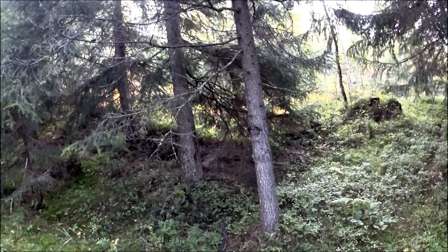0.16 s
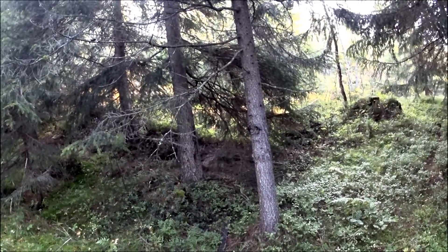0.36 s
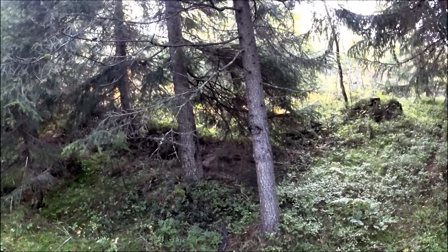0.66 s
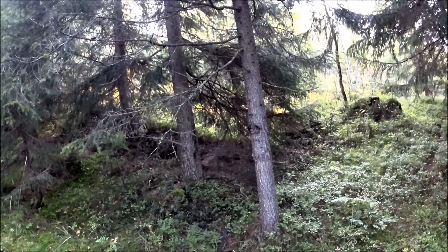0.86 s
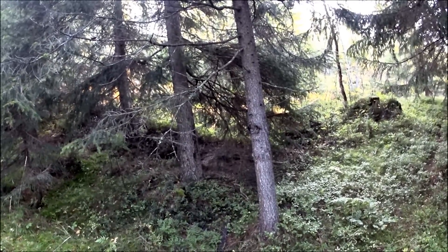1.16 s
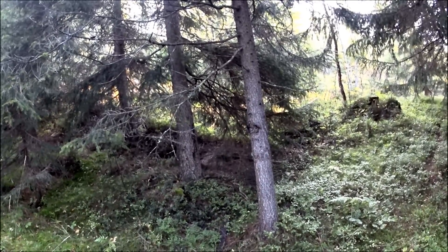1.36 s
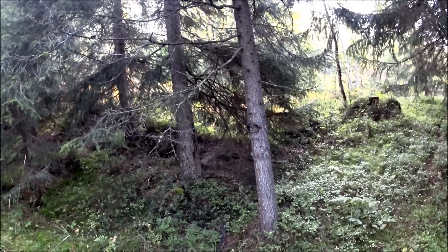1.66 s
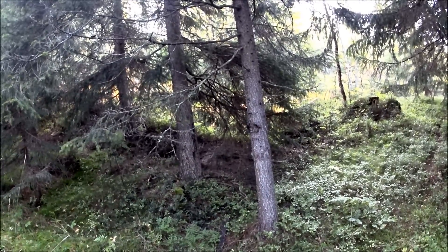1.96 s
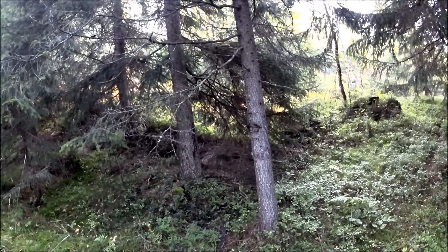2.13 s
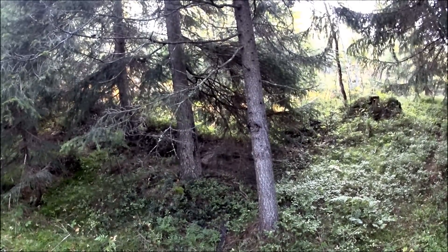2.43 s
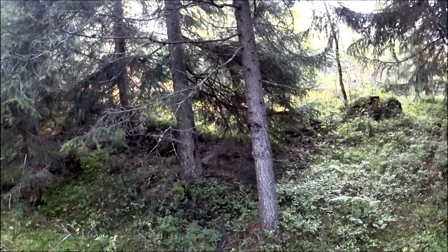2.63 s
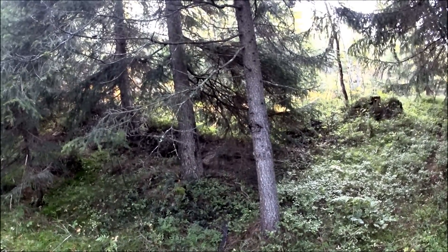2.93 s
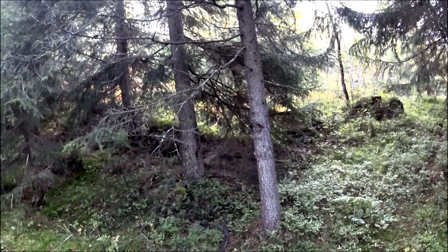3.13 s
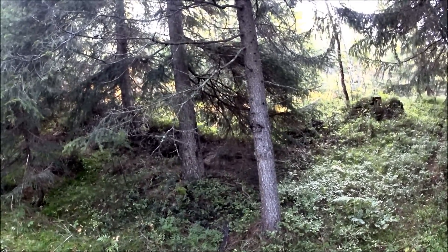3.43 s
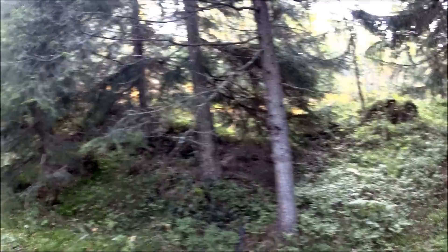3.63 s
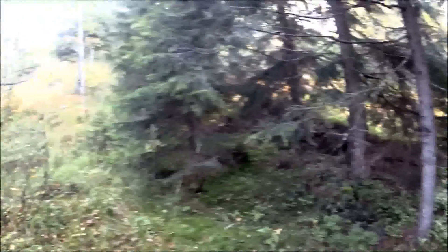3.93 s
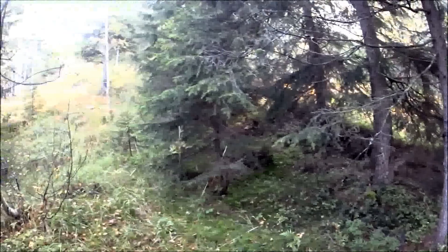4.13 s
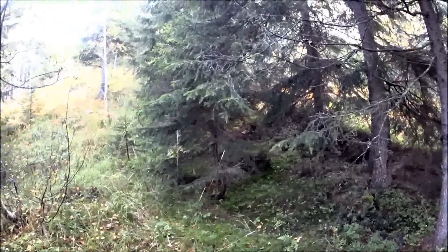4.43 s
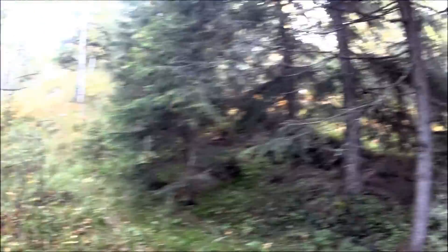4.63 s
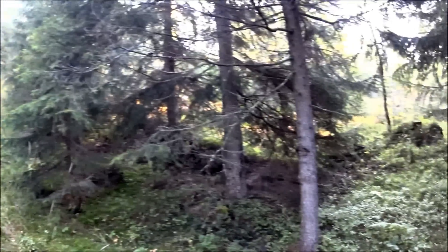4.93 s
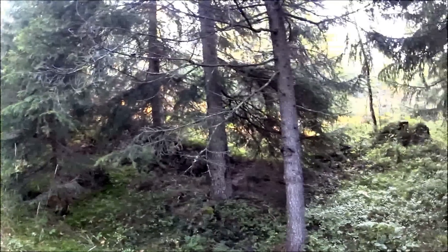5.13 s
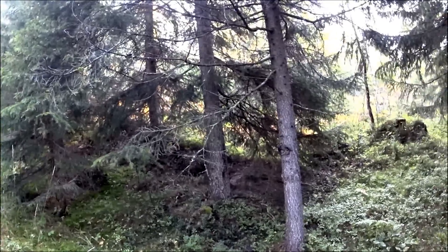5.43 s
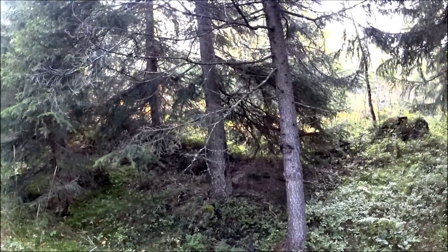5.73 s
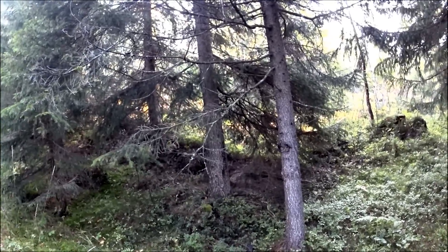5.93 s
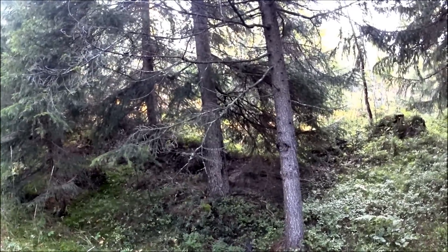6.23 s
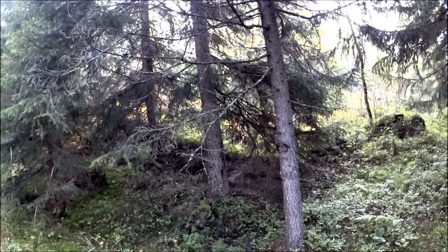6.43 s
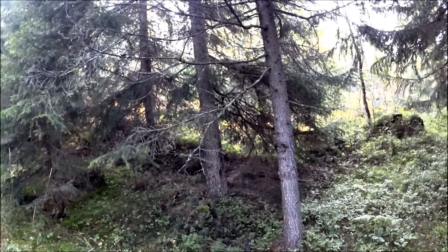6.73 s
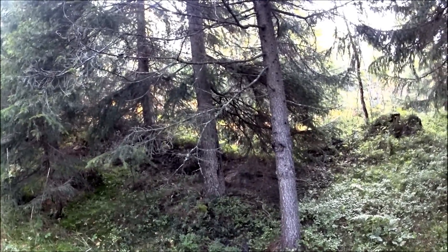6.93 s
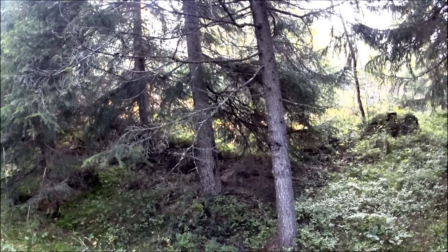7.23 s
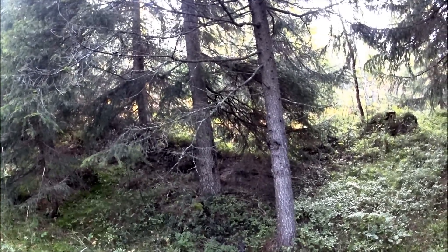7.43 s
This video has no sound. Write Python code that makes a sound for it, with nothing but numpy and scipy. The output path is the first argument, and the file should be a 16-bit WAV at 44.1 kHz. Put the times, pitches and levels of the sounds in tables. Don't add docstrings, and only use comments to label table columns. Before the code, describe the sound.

Hunting dog yelps every half second among spruces, some cracking into rough barks, with ringing echo, handling clicks and faint bird notes.

```python
import sys
import numpy as np
from scipy import signal
from scipy.fft import rfft, irfft
from scipy.io import wavfile
from scipy.ndimage import uniform_filter1d, map_coordinates

SR = 44100
rng = np.random.default_rng(int(sys.argv[2]) if len(sys.argv) > 2 else 0)


def gain_from_decibels(decibels):
    exponent = np.asarray(decibels, float) / 20
    return 10 ** exponent


def store_wav(level_fs):
    pcm = np.round(np.clip(np.atleast_2d(level_fs), -1, 1) * 32767)
    wavfile.write(sys.argv[1], SR, pcm.T.astype(np.int16))


N = 333837

# (frequency [Hz], level per Hz [dB])
HISS = [(15, -48), (25, -11.5), (47, -11), (81, -10), (145, -9), (270, -8.5), (600, -8), (1200, -9.5),
        (1600, -12), (2800, -15.5), (6000, -18), (15700, -21)]
# (frequency [Hz], likeness [-1 to 1])
LIKENESS = [(60, 0.85), (130, 0.5), (290, -0.1), (640, -0.32), (1410, -0.52), (3100, -0.35), (6820, 0.39),
            (15000, 0.88)]
# (frequency [Hz], width [Hz], level [dB])
HUM = [(59.6, 5.5, -75.5), (120.3, 5.4, -82.5)]
HISS_DB, QUIET_FROM_S, SINK_DB_PER_S = -57.5, 6.48, 3.5

# (time [s], length [s], level [dB])
RUSTLE = [
    (5.203, 0.11, -49.5),
    (5.529, 0.13, -51.5),
    (6.518, 0.095, -56.5),
]
# (frequency [Hz], level per Hz [dB])
CLOTH = [(150, -16), (400, 1), (900, 3), (1900, 4), (3200, -5), (5000, -12.5), (7500, -12.5), (9500, -53)]
# (time [s], peak [dB], ring
# [Hz], time to fall 60 dB [s])
KNOCKS = [(2.197, -37.5, 790, 0.033), (5.2265, -28, 1300, 0.007), (6.105, -41, 2900, 0.005),
          (6.105, -33, 1650, .008), (5.2735, -38, 6200, .003), (5.2735, -32, 2600, .003),
          (5.273, -37.5, 3340, 0.015), (5.273, -52, 2300, .015), (5.273, -40, 610, 0.016),
          (5.273, -46, 4370, .012), (5.543, -31, 702, 0.046), (5.56, -47, 316, 0.092),
          (5.274, -48, 5515, 0.011), (5.556, -43, 1720, 0.06), (5.558, -36, 2600, .004),
          (5.585, -44, 1800, .07), (5.625, -50, 1760, 0.077), (6.42, -43, 5040, 0.0055),
          (6.541, -49, 1980, 0.12)]
# (time [s], peak [dB], ring [Hz])
TICKS = [
    (5.2115, -46, 2180),
    (5.2167, -44, 1818),
    (5.2258, -38, 2217),
    (5.2413, -41, 1930),
]
TICK_T60_S = 0.011
# (time [s], peak [dB], ring [Hz], time to fall 60 dB [s])
BUCKLE = (5.2726, -23, 1200, .016)
# (time [s], level [dB])
SQUEEZES = [
    (.25, -74),
    (3.57, -62.5),
    (3.86, -68),
    (4.04, -65),
    (4.62, -69),
    (4.76, -66),
    (5.26, -63),
    (6.09, -67),
]
GRIP_DB, GRIP_WAVER_DB, SQUEEZE_S = -76, 1, 0.04

# (time [s], length [s], start pitch [Hz], end pitch [Hz], level [dB])
CHIRPS = [
    (5.694, 0.018, 5200, 4820, -68.5),
    (5.714, 0.031, 4580, 5680, -60),
    (5.948, 0.011, 4800, 4560, -58.5),
    (6.283, 0.021, 4264, 4615, -66),
    (6.3, 0.017, 4757, 5675, -62),
    (6.441, 0.016, 8000, 7360, -65),
    (6.442, 0.012, 4760, 4350, -60),
]

# (frequency [Hz], near trunks fall 60 dB in [s], far slopes fall 60 dB in [s], side share [0-1])
SCATTER = [(300, 0.077, 0.34, 0.4), (412, 0.36, 1.26, 0.1), (560, 0.12, 2.17, 0.2), (790, 0.15, 1.74, 0.3),
           (1200, 0.45, 2.84, 0.55), (1700, 0.36, 2.2, 0.6), (2400, 0.5, 1.72, 0.97), (4000, 1, 1.3, 0.9),
           (8000, 0.59, 0.42, 0.52)]
# (time [s], spread [ms])
SWAY = [(0, .05), (1.4, .04), (1.6, .06), (1.9, .06), (2.4, .1), (2.9, .04), (3.8, .04), (3.9, .11),
        (4.9, .09), (5.9, .015)]
NEEDLE_HZ, NEEDLE_PASS = 2960, 0.82
# (time [s], pitch [Hz], width
# [Hz], level [dB], time to fall 60 dB [s])
WOOD_RINGS = [(6.08, 735, 51, -42, 0.4), (0.29, 1245, 120, -47.5, 2.6), (.6, 535, 28, -51, 1.56),
              (6.06, 2390, 42, -50, 1.3), (6.06, 616, 83, -49, 0.48), (5.985, 1770, 350, -51.5, 0.83),
              (0.9, 543, 33, -58, 3.6), (6.08, 1208, 33, -40, 2.13), (1.97, 550, 32, -54, 0.51),
              (5.1, 1101, 149, -50, 3.7), (5.1, 2240, 220, -63, 3.4), (3.95, 1030, 90, -37, 1.3),
              (3.96, 2090, 140, -49, 2.0), (4.015, 820, 220, -45, .9), (6.45, 1205, 25, -55, 3.5),
              (.75, 540, 14, -56, 3.5),
              (6.05, 3000, 900, -53, .5), (6.04, 5200, 3000, -57, .4), (3.9, 3130, 150, -63, .9),
         (3.9, 4180, 200, -65, .9), (3.28, 585, 40, -53, 2.5), (3.6, 570, 60, -54, 2.5),
         (4.6, 420, 50, -60, 2.5), (2.0, 1110, 90, -47, 1.3), (3.46, 1450, 250, -46, .7),
         (4.9, 1100, 110, -43, 1.5)]
# (time [s], length [s], start pitch [Hz], end pitch
# [Hz], level [dB])
BRIEF_TONES = [(.527, .008, 1180, 1170, -40), (.549, .016, 1173, 1140, -37), (0.606, 0.037, 548, 535, -45),
               (.655, 0.053, 540, 527, -49), (3.075, .035, 895, 900, -36), (3.2, .06, 1190, 1185, -43),
               (3.655, .03, 1200, 1205, -43), (1.962, .024, 1110, 1130, -40), (1.93, .01, 1150, 1120, -44),
               (1.522, 0.05, 1295, 1250, -42), (2.0, .013, 1270, 1260, -34), (6.14, .05, 2380, 2370, -48),
               (6.24, .07, 2370, 2360, -52), (6.34, .07, 2370, 2370, -55), (3.996, 0.015, 1055, 1045, -29.5),
               (4.016, 0.024, 1040, 1035, -36), (3.958, .014, 1036, 1060, -31), (4.02, .03, 2080, 2050, -44),
               (4.075, .016, 1015, 1015, -38), (1.578, .024, 2200, 2150, -52), (1.622, .03, 2200, 2180, -56),
               (1.692, 0.023, 1140, 1130, -43.5), (2.446, .02, 1150, 1140, -41.5),
               (2.592, 0.017, 1900, 1900, -63), (6.49, .02, 1200, 1200, -45.5), (1.61, 0.012, 1120, 1100, -42),
               (1.628, .012, 1127, 1110, -44), (2.218, 0.017, 1155, 1140, -44), (4.87, 0.028, 1118, 1070, -31),
               (4.94, 0.028, 2260, 2250, -44), (6.07, 0.022, 2400, 2400, -38), (6.115, 0.018, 2394, 2400, -43),
               (6.075, 0.029, 1200, 1233, -30), (6.25, 0.031, 1192, 1220, -37), (6.462, 0.031, 1200, 1161, -40),
               (6.62, 0.022, 1220, 1180, -58)]

# (time [s], held length [s], pitch [Hz], end pitch [Hz], level [dB])
YELPS = [
    (.045, 0.13, 1200, 1087, -46),
    (.524, 0.038, 1178, 1126, -45),
    (1.018, 0.096, 1173, 1118, -43),
    (1.93, .11, 1105, 1085, -44),
    (2.42, 0.032, 1165, 1098, -39.5),
    (2.924, 0.036, 1180, 1163, -30),
    (3.408, 0.0309, 1180, 1260, -36.5),
]
# (swell [s], slack [dB], last push re first [dB], octave partial at first [dB], octave later [dB])
EFFORT = [
    (0.01, 4, 8, -22, -54),
    (0.0094, 4, -1, -11, -25),
    (0.0067, 21, -7, -15, -18.5),
    (0.0499, 20, -3.5, -22, -23),
    (0.015, 9.5, -2.5, -32, -32),
    (0.0054, 0, -8.5, -34, -18),
    (0.01, -4, 1.5, -4.5, -24),
]
ATTACK_S, ATTACK_DB, SWELL_DB_PER_S = 0.0049, 28, 173
SLACK_AT, SAG_BY_SLACK = 0.54, 0.358
RELEASE_S, RELEASE_DB = 0.009, 9.5
SLIDES = {4: (0.029, 918, 1)}
SLIDE_EARLY, SLIDE_OCTAVE_DB = 0.39, -11

# (time [s], pitch [Hz], level [dB], octave partial re fundamental [dB])
BROKEN_BAY = [(1.458, 1170, -60, -1), (1.463, 1160, -41.5, -3), (1.476, 1150, -50, 6),
              (1.5, 1167, -41.5, -30), (1.53, 1146, -58, -5), (1.555, 1130, -56, -10),
              (1.576, 1104, -39, -17), (1.595, 1074, -43.5, -9), (1.62, 730, -57, -38)]
LOW_BAY = [(3.885, 1058, -52, -18), (3.891, 1063, -34, -19), (3.92, 1040, -32.5, -11),
           (3.943, 1037, -31, -11.5), (3.958, 1035, -46, -13), (3.98, 1061, -31.5, -26),
           (3.991, 1031, -47, -13), (4.004, 880, -34.5, -20), (4.018, 596, -42.5, -45)]
CRACKED_BAY = [(4.248, 1118, -51, -13), (4.26, 1115, -34.5, -14), (4.282, 1115, -29, -19),
               (4.294, 1123, -33, -17), (4.305, 1114, -45.5, -5), (4.335, 1100, -43, -5),
               (4.351, 1074, -30.5, -17.5), (4.364, 900, -37.5, -16), (4.384, 570, -39, -45)]
THROBBING_BAY = [(4.713, 1148, -65, -15), (4.72, 1149, -28, -13.5), (4.734, 1139, -41.5, 2),
                 (4.748, 1134, -30, -18), (4.775, 1113, -36, -7), (4.8, 1109, -36.5, -10),
                 (4.816, 1087, -30.5, -14), (4.829, 949, -38.5, -11), (4.85, 600, -43.5, -40)]
LAST_BAY = [(5.983, 1046, -41, 4), (5.988, 1091, -30, -5.5), (5.999, 1164, -32, -9), (6.018, 1171, -23, 2),
            (6.029, 1200, -22.5, 0), (6.039, 1236, -29.5, -2.5), (6.047, 1200, -26.5, -7),
            (6.057, 1096, -28, -3.5), (6.064, 950, -41, 6)]

# (left minus right [dB], forest tail [dB], breath [dB], upper partials [dB])
PLACES = [(-4, 1, -40, -10), (-5, 6.5, -33, -9), (-4, 6.5, -34, -8), (-5, -1.5, -25, -2),
          (-4.5, -0.5, -27, 1), (-4, 1.5, -32, -8), (-4.5, -2, -26, -5), (-4.5, 0, -25, -5),
          (-8.5, -7, -33, -7.5), (-9, -2, -26.5, -3), (-7.5, -2.5, -20.5, -3), (-5, -10, -28.5, 0.5)]
UPPER = [-29, -32.5, -34.5, -51, -40]
# (frequency [Hz], level [dB])
MOUTH = [(450, -20), (700, 3), (880, -3), (1020, -0.86), (1300, -0.35), (1650, 28), (1950, 3.5),
         (2150, 3.5), (2600, -5.5)]
# (time [s], length [s], start pitch [Hz], end pitch [Hz], level [dB])
WHISTLES = [(.05, 0.027, 1230, 1365, -42), (1.522, 0.049, 1295, 1250, -45),
            (.047, 0.014, 2390, 2410, -50.5), (1.985, 0.018, 1240, 1270, -33), (3.455, .04, 930, 865, -37),
            (3.45, .075, 1740, 1735, -50), (3.53, .03, 2160, 2140, -54), (2.965, .04, 425, 470, -42),
            (4.762, 0.038, 1300, 1285, -36.5), (4.81, 0.047, 1320, 1200, -44.5), (.56, 0.03, 570, 550, -51),
            (2.926, 0.028, 3560, 3540, -62), (2.926, .02, 4750, 4740, -64), (2.926, 0.033, 5940, 5900, -61),
            (3.41, 0.018, 4750, 4800, -66), (1.96, 0.021, 1680, 1720, -56), (6.075, 0.056, 466, 377, -53),
            (5.3, 0.031, 500, 380, -58), (5.976, 0.018, 757, 830, -39.5), (6.058, 0.0202, 855, 680, -30.5),
            (.533, 0.026, 3560, 3520, -63.5), (1.025, .03, 3520, 3480, -65.5),
            (1.462, 0.02, 5760, 5740, -61), (1.56, 0.057, 4430, 4380, -66), (2.425, .055, 3480, 3330, -58),
            (2.505, 0.036, 3400, 3450, -66), (4.755, 0.017, 1155, 1176, -33),
            (2.428, 0.022, 5850, 5780, -64), (4.258, 0.038, 6750, 6550, -62.5),
            (4.32, 0.0343, 1800, 1580, -42), (4.72, 0.04, 5750, 5600, -56.5),
            (5.995, 0.034, 3470, 3540, -49.5), (6.015, 0.069, 4800, 4760, -57),
            (2.48, 0.078, 965, 940, -48.5), (2.49, .07, 1950, 1870, -65.5)]
BEAM_HZ = 3000

# (time [s], length [s], pitch [Hz], level [dB], top [Hz])
BARKS = [(.075, 0.1, 300, -43.5, 1700), (0.554, 0.067, 277.5, -48, 1200), (1.938, 0.063, 257.3, -60.5, 601),
         (2.962, 0.047, 217, -35, 1520), (2.992, 0.062, 285, -33, 1420), (3.443, 0.048, 215.9, -35.5, 2150),
         (3.478, 0.049, 289, -35, 2400), (4.305, 0.049, 205.2, -31, 955), (4.77, 0.056, 309.5, -44.5, 2194)]
# (frequency [Hz], width [Hz], level [dB])
THROAT = [(457, 208, -2.5), (624, 176, -1), (900, 144, 2), (1180, 200, -5), (1680, 360, -7.5),
          (2260, 91, -13)]
BARK_RISE, ROUGH_AT_200_HZ, ROUGH_PER_HZ = 1.09, .26, 0.0028
# (time [s], level [dB])
GASPS = [
    (4.83, -44),
    (6.058, -40.5),
]
# (length [s], start pitch [Hz], end pitch [Hz], roughness [0-1], top [Hz])
GASP = (0.038, 200, 240, 0.38, 3200)


def rms_one(x):
    return x / np.sqrt(np.mean(x ** 2) + 1e-20)


def at_hz(points, hz):
    table = np.array(points)
    return np.interp(np.log(hz), np.log(table[:, 0]), table[:, 1])


def add(track, s, sound):
    i = round(s * SR)
    track[..., i:i + sound.shape[-1]] += sound[..., :N - i]


def pan(x, db):
    return x * gain_from_decibels(np.array([[db / 2], [-db / 2]]))


def filtered(x, order, hz, kind="low"):
    return signal.sosfilt(signal.butter(order, hz, kind, fs=SR, output="sos"), x)


def resonance(x, hz, width):
    r = np.exp(-np.pi * width / SR)
    top = np.array([1, 0, -1]) * (1 - r * r) / 2
    return signal.lfilter(top, [1, -2 * r * np.cos(2 * np.pi * hz / SR), r * r], x)


def waver(size):
    smooth = uniform_filter1d(rng.standard_normal(N), size=size)
    return rms_one(uniform_filter1d(smooth, size=size))


def flicker(count, size):
    smooth = uniform_filter1d(rng.standard_normal(N // 4), size=size)
    return rms_one(uniform_filter1d(smooth, size=size))[:count]


def coloured(spectrum, likeness):
    hz = np.maximum(np.arange(N // 2 + 1) * SR / N, 1)
    mid, side = rfft(rng.standard_normal((2, N))) * gain_from_decibels(at_hz(spectrum, hz))
    alike = np.clip(at_hz(likeness, hz), -.95, .95)
    side = side * np.sqrt((1 - alike) / (1 + alike))
    mid, side = irfft(mid, N), irfft(side, N)
    return np.array([mid + side, mid - side]) / np.std(mid)


def glide(length, from_hz, to_hz, db):
    u = np.linspace(0, 1, round(length * SR))
    phase = 2 * np.pi * np.cumsum(from_hz + (to_hz - from_hz) * u) / SR
    return gain_from_decibels(db) * np.sqrt(2) * np.sin(np.pi * u ** 0.87) * np.sin(phase)


def recorder_floor():
    hum = np.zeros(N)
    for hz, width, db in HUM:
        noise = rng.standard_normal(N)
        hum += gain_from_decibels(db) * rms_one(resonance(resonance(noise, hz, width), hz, width))
    quiet_s = np.maximum(0, np.arange(N) / SR - QUIET_FROM_S)
    return gain_from_decibels(HISS_DB - SINK_DB_PER_S * quiet_s) * coloured(HISS, LIKENESS) + pan(hum, -2.1)


def rustle():
    t, level = np.arange(N) / SR, np.zeros(N)
    for s, length, db in RUSTLE:
        level += gain_from_decibels(db) * np.sin(np.pi * np.clip((t - s) / length, 0, 1)) ** .7
    grain = gain_from_decibels(2.6 * rms_one(uniform_filter1d(rng.standard_normal(N), size=90)))
    return level * grain * coloured(CLOTH, [(100, .7), (10000, .6)])


def knocks():
    t, out = np.arange(4000) / SR, np.zeros(N)
    for s, db, hz, t60 in [*KNOCKS, BUCKLE] + [(*tick, TICK_T60_S) for tick in TICKS]:
        onset = 1 - np.exp(-t * hz / 1.2)
        add(out, s, gain_from_decibels(db - 60 * t / t60) * onset * np.sin(2 * np.pi * hz * t))
    return pan(out, -5.5)


def grip():
    t = np.arange(N) / SR
    rumble = coloured([(30, -28), (80, 0.0), (160, -6.5), (300, -14.0), (600, -61)],
                      [(50, 1.0), (300, 0.68)])
    pressure = gain_from_decibels(GRIP_DB + GRIP_WAVER_DB * waver(size=3000))
    for s, db in SQUEEZES:
        pressure += gain_from_decibels(db) * np.exp(-((t - s) / SQUEEZE_S) ** 2)
    return pressure * rumble


def bird():
    out = np.zeros(N)
    for s, *note in CHIRPS:
        add(out, s, glide(*note))
    return pan(out, -1.4)


def far_ring(s, hz, width, db, t60):
    age = np.maximum(0, np.arange(N) / SR - s)
    noise = rng.standard_normal((2, N))
    mid, side = rms_one(resonance(resonance(noise, hz, width), hz, width))
    level = gain_from_decibels(db - 60 * age / t60) * np.minimum(1, age / 0.013)
    return level * pan(1.0, -6.5) * (mid + 0.38 * side * np.array([[1], [-1]]))


def forest():
    t, out = np.arange(round(2.5 * SR)) / SR, 0
    white = rng.standard_normal((2, 2, len(t)))
    edges = 200 * 2 ** np.arange(0, 6.1, 1 / 3)
    hz, *columns = np.transpose(SCATTER)
    for k, (low, high) in enumerate(zip(edges, edges[1:])):
        centre = np.log(low * high) / 2
        near, far, share = (np.interp(centre, np.log(hz), c) for c in columns)
        mid, side = filtered(white[k % 2], 2, [low, high], "band")
        decay = gain_from_decibels(-60 * t / near) + gain_from_decibels(-4.5 - 60 * t / far)
        out = out + decay * (mid + share * side * np.array([[1], [-1]]))
    return out * (1 - np.exp(-t / 0.011)) * gain_from_decibels(-33.5)


def scattered(sent, trunks):
    samples = np.arange(N)
    spread_ms = np.interp(samples / SR, *np.transpose(SWAY))
    late = samples + spread_ms * SR / 1000 * waver(size=300)
    smeared = map_coordinates(sent, [late])
    return pan(0.99, -3.0) * signal.fftconvolve(smeared[None], trunks, axes=1)[:, :N]


def outline(bay):
    s, length, hz, end_hz, db = YELPS[bay]
    swell, slack_db, last_db, octave_db, later_db = EFFORT[bay]
    swell = np.clip(swell, 1.1 * ATTACK_S, .7 * length)
    start_db, last_db = db - SWELL_DB_PER_S * (swell - ATTACK_S), db + last_db
    slack_s = swell + SLACK_AT * (length - swell)
    slack_hz = hz + SAG_BY_SLACK * (end_hz - hz)
    rows = [(0, hz, start_db - ATTACK_DB, octave_db),
            (ATTACK_S, hz, start_db, octave_db),
            (swell, hz, db, octave_db),
            (slack_s, slack_hz, db - slack_db, later_db),
            (length, end_hz, last_db, later_db)]
    slide, to_hz, loss_db = SLIDES.get(bay, (0, end_hz, 0))
    if slide:
        half_hz, half_db = end_hz + SLIDE_EARLY * (to_hz - end_hz), last_db - loss_db
        rows += [(length + slide / 2, half_hz, half_db, later_db + SLIDE_OCTAVE_DB),
                 (length + slide, to_hz, half_db - RELEASE_DB, later_db + 2 * SLIDE_OCTAVE_DB)]
    else:
        rows += [(length + RELEASE_S, end_hz, last_db - RELEASE_DB, later_db)]
    return np.array(rows) + [s, 0, 0, 0]


def yelp(rows, breath_db, upper_db):
    s, hz, db, octave_db = np.transpose(rows)
    t = np.arange(s[0], s[-1], 1 / SR)
    count = len(t)
    pitch = np.interp(t, s, hz) * (1 + .006 * flicker(count, size=250))
    phase = 2 * np.pi * np.cumsum(pitch) / SR
    voice = gain_from_decibels(at_hz(MOUTH, pitch)) * np.sin(phase)
    low_db = 200 * np.minimum(0, np.log2(pitch / 985))
    octave_level = gain_from_decibels(np.interp(t, s, octave_db) + at_hz(MOUTH, 2 * pitch) + low_db)
    voice -= octave_level * np.cos(2 * phase)
    slack_db = 90 * np.minimum(0, np.log2(pitch / hz[1]) + 0.059)
    for k, level in enumerate(UPPER, 3):
        partial_db = level + upper_db + slack_db + 4.5 * flicker(count, size=140)
        voice += gain_from_decibels(partial_db) * np.sin(k * phase + k)
    air = filtered(rng.standard_normal(N // 4)[:count], 4, [1300, 7500], "band")
    late = ((t - s[0]) / (s[-1] - s[0])) ** 3
    voice *= gain_from_decibels(4.94 * late * flicker(count, size=130))
    breath = gain_from_decibels(breath_db + 7.0) * late ** 0.38 * air
    edges = np.minimum(1, np.minimum(t - s[0], s[-1] - t) / .003)
    return edges * gain_from_decibels(np.interp(t, s, db)) * (np.sqrt(2) * voice + breath)


def bark(length, from_hz, to_hz, db, rough, top_hz):
    u = np.linspace(0, 1, round(length * SR))
    wobble, noise = rng.standard_normal((2, N // 32))[:, :len(u)]
    unsteady = 1 + .12 * rough * rms_one(uniform_filter1d(wobble, size=200))
    pitch = (from_hz + (to_hz - from_hz) * u) * unsteady
    pulses = np.diff(np.floor(np.cumsum(pitch) / SR), prepend=0)
    source = pulses * (1 + .8 * rough * wobble) + 0.22 * rough * noise
    voice = np.zeros(len(u))
    for k, (hz, width, gain_db) in enumerate(THROAT):
        voice += (-1) ** k * gain_from_decibels(gain_db) * resonance(source, hz, width)
    voice = filtered(voice, 6, [1.93 * from_hz, 2450], "band")
    voice = filtered(voice, 2, top_hz)
    return gain_from_decibels(db) * rms_one(voice) * np.minimum(1, 12.3 * u) * np.minimum(1, 2.15 * (1 - u))


def hound():
    bays = np.zeros((len(PLACES), N))
    outlines = [outline(k) for k in range(len(YELPS))]
    outlines += [BROKEN_BAY, LOW_BAY, CRACKED_BAY, THROBBING_BAY, LAST_BAY]
    outlines.sort(key=lambda rows: rows[0][0])
    starts = [rows[0][0] - .02 for rows in outlines]
    for k, rows in enumerate(outlines):
        add(bays[k], rows[0][0], yelp(rows, *PLACES[k][2:]))

    parts = []
    for s, length, hz, db, top_hz in BARKS:
        rough = ROUGH_AT_200_HZ + ROUGH_PER_HZ * (hz - 200)
        parts.append((s, bark(length, hz, BARK_RISE * hz, db, rough, top_hz)))
    parts += [(s, bark(*GASP[:3], db, *GASP[3:])) for s, db in GASPS]
    parts += [(s, glide(*tone)) for s, *tone in WHISTLES if tone[1] < BEAM_HZ]
    for s, sound in parts:
        add(bays[np.searchsorted(starts, s) - 1], s, sound)

    direct = sum(pan(bay, place[0]) for bay, place in zip(bays, PLACES))
    for s, *tone in WHISTLES:
        if tone[1] >= BEAM_HZ:
            add(direct, s, pan(glide(*tone), -4.5))
    for s, *tone in BRIEF_TONES:
        add(direct, s, pan(glide(*tone), 0.0))

    sent = sum(gain_from_decibels(place[1]) * bay for bay, place in zip(bays, PLACES))
    burst = rng.standard_normal(N) * (np.arange(N) < 900)
    sent += gain_from_decibels(-24.5) * resonance(resonance(burst, 1100, 300), 1000, 400)
    sent = NEEDLE_PASS * sent + (1 - NEEDLE_PASS) * filtered(sent, 4, NEEDLE_HZ)
    return direct, sent


def scene():
    background = recorder_floor() + rustle() + knocks() + grip() + bird()
    rings = sum(far_ring(*ring) for ring in WOOD_RINGS)
    direct, sent = hound()
    return background + rings + scattered(sent, forest()) + direct


def low_pass(x):
    return signal.sosfilt(signal.butter(12, 15765, fs=SR, output="sos"), x)


def record(dry):
    return low_pass(dry)


dry = scene()
out = record(dry)
store_wav(out)
```